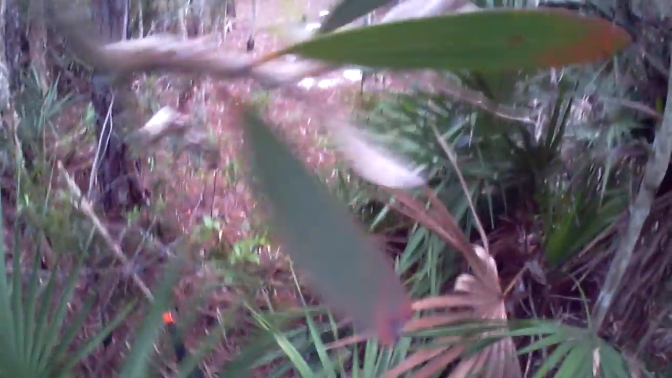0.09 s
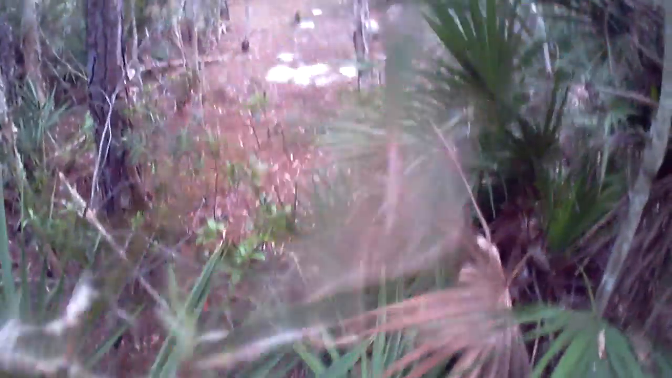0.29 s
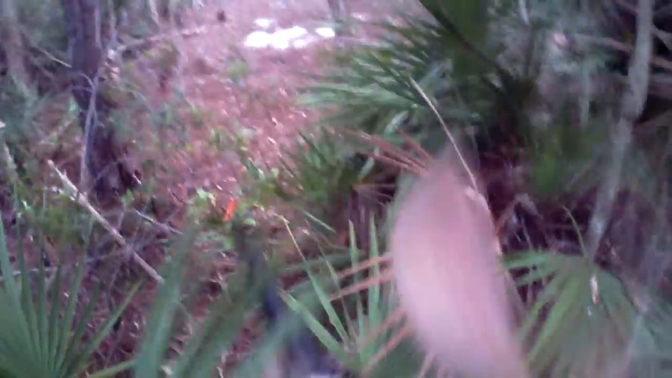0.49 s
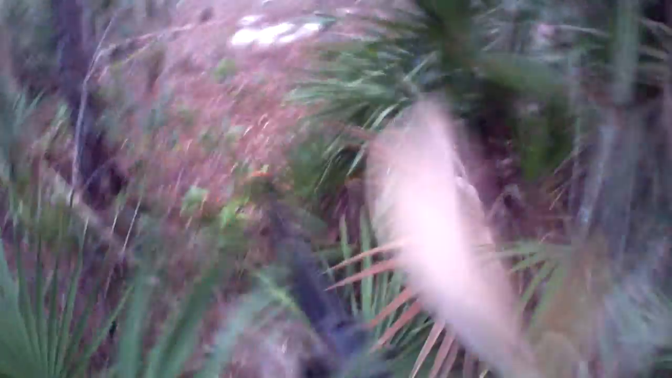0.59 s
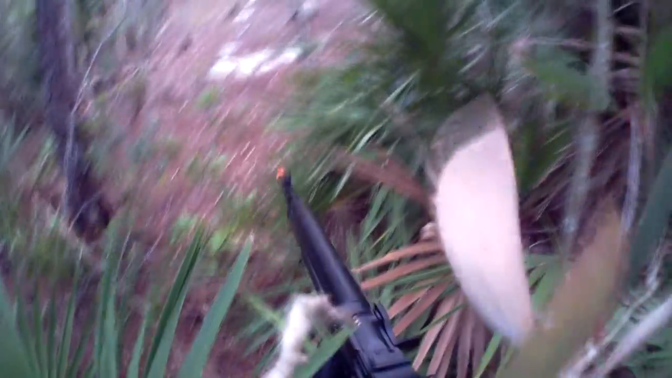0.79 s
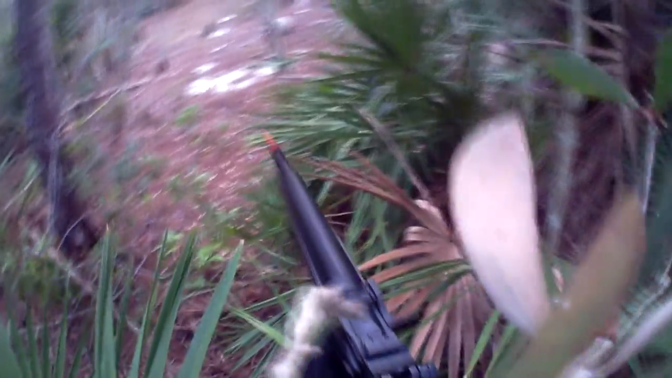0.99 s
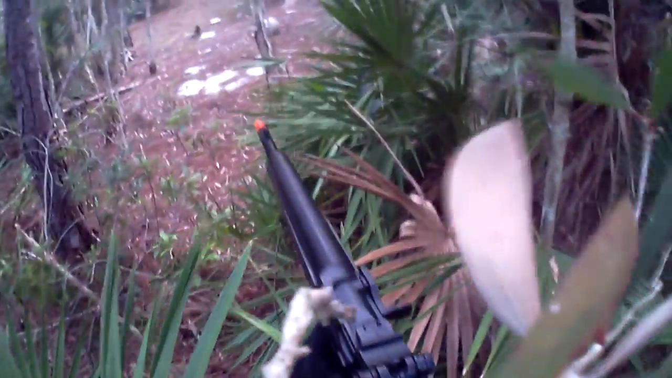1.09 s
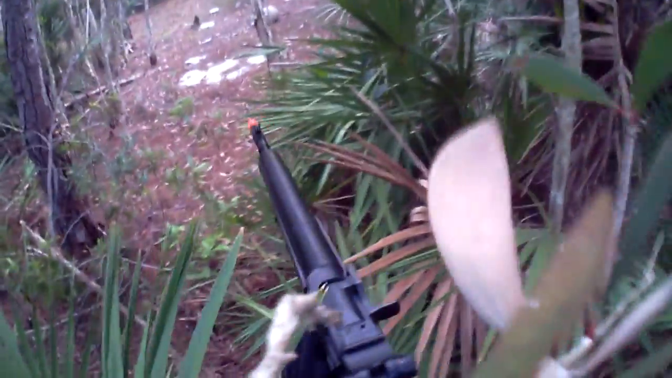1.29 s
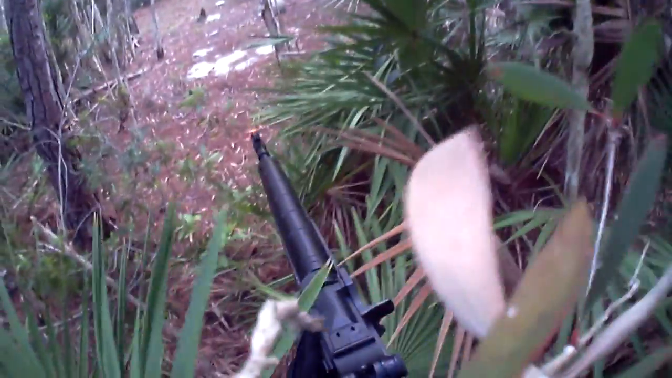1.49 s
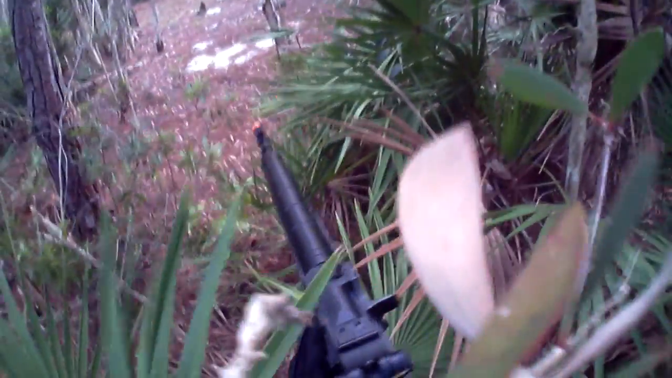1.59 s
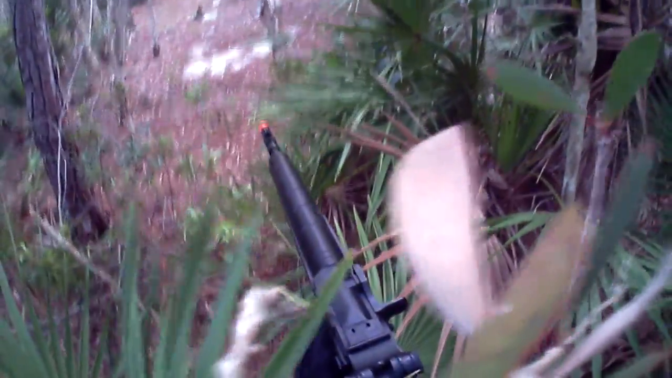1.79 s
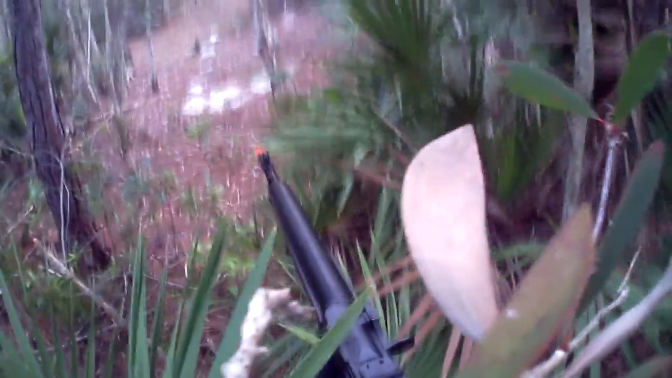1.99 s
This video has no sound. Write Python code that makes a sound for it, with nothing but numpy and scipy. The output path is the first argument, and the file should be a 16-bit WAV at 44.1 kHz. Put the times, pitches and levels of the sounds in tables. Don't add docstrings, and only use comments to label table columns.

```python
import sys
import numpy as np
from scipy import signal
from scipy.fft import rfft, irfft
from scipy.io import wavfile
from scipy.ndimage import uniform_filter1d, map_coordinates

SR = 44100
rng = np.random.default_rng(int(sys.argv[2]) if len(sys.argv) > 2 else 0)


def voltage_ratio(level):
    return 10 ** (np.asarray(level, float) / 20)


def store_wav(level_fs):
    pcm = np.round(np.clip(np.atleast_2d(level_fs), -1, 1) * 32767)
    wavfile.write(sys.argv[1], SR, pcm.T.astype(np.int16))


N = 88200

# (frequency [Hz], level [dB])
BROAD = [(180, -32), (420, 0), (1000, -4.5), (5800, -7), (11100, -6.5), (14500, -19), (16000, -80)]


def unit(x):
    return x / np.sqrt(np.mean(x ** 2) + 1e-20)


def curve(rows):
    times, db = np.transpose(rows)
    return voltage_ratio(np.interp(np.arange(N) / SR, times, db))


def wobble(rate):
    return map_coordinates(rng.standard_normal(3000), [np.arange(N) * rate / SR])


def coloured(x, points):
    f, db = np.transpose(points)
    hz = np.fft.rfftfreq(8192, 1 / SR)
    gain = voltage_ratio(np.interp(np.log(hz + 1), np.log(f + 1), db))
    cepstrum = irfft(np.log(np.maximum(gain, 1e-4)))
    cepstrum[1:4096] *= 2
    cepstrum[4097:] = 0
    pulse = irfft(np.exp(rfft(cepstrum)))
    return signal.fftconvolve(x, pulse / np.linalg.norm(pulse))[:N]


def slips(per_s, spread_db, clump_db, clump_rate):
    hit = rng.random(N) < per_s / SR
    size = rng.standard_normal(N) * voltage_ratio(spread_db * rng.standard_normal(N))
    return unit(hit * size * voltage_ratio(clump_db * wobble(clump_rate)))


def strokes(rows):
    t = np.arange(N) / SR
    total = np.zeros(N)
    for start, rise, hold, fall, db in rows:
        corners = np.cumsum([start, rise, hold, fall])
        total += voltage_ratio(db) * np.interp(t, corners, [0, 1, 1, 0]) ** 2
    return total


def ring(x, hz, width_hz):
    t = np.arange(SR // 80) / SR
    pulse = t ** 3 * np.exp(-2 * np.pi * width_hz * t) * np.sin(2 * np.pi * hz * t)
    return signal.fftconvolve(x, pulse / np.linalg.norm(pulse))[:N]


def leaf_edges(x, rate, swing_db):
    # (frequency [Hz], width [Hz], level [dB])
    resonances = [(4080, 510, -20), (7703, 950, -8.5), (8900, 1220, -3.5), (10514, 1740, -6.5),
                  (12870, 2700, -8)]
    return sum(voltage_ratio(db) * ring(x * voltage_ratio(swing_db * wobble(rate)), hz, width)
               for hz, width, db in resonances)


def patchy(x, depth_db):
    spectrum = signal.stft(x, nperseg=256)[2]
    field = rng.standard_normal(spectrum.shape)
    field = uniform_filter1d(uniform_filter1d(field, size=6, axis=0), size=4, axis=1)
    return signal.istft(spectrum * voltage_ratio(depth_db * unit(field) - 1), nperseg=256)[1][:N]


def scrapes():
    # (start [s], length [s], bright level [dB], broad rustle over it [dB])
    drags = [(0.017, 0.02, -36.5, -22), (0.072, 0.028, -37.5, -10), (0.095, 0.016, -34, -1.5),
             (0.133, 0.055, -46, -26), (0.176, 0.019, -40, -20), (0.198, 0.017, -36.5, -13),
             (0.22, 0.012, -41.5, 6), (0.23, 0.016, -20, -14.5), (0.248, 0.016, -20, -19.5),
             (0.272, 0.055, -29, -18), (0.327, 0.0082, -19.5, -12.5), (0.343, 0.014, -16.5, -15.5),
             (0.368, 0.0056, -39.5, 10), (0.379, 0.014, -25, -4), (0.389, 0.023, -23, -19),
             (0.408, 0.017, -11, -16), (0.426, 0.022, -16.5, -12), (0.444, 0.013, -16.5, -15.5),
             (0.454, 0.012, -37, -2.5), (0.473, 0.016, -30, -5), (0.501, 0.014, -26, -14.5),
             (0.607, 0.01, -49, -15.5), (0.751, 0.054, -49, 2.5), (0.782, 0.015, -41, -9.5),
             (0.633, 0.016, -46.5, -8), (0.655, 0.02, -45, -11), (1.718, 0.01, -53.5, -7.5),
             (1.515, 0.055, -62, 6), (0.8, 0.079, -45.5, 0.5), (0.871, 0.085, -57, 6),
             (0.986, 0.09, -62, 12), (1.715, 0.078, -56.5, 0.5), (1.784, 0.12, -50.5, 3),
             (1.867, 0.025, -46.5, 0), (1.88, 0.081, -60, 5.5)]
    bright = strokes([(s, 0.099 * d, 0.77 * d, 0.307 * d, db) for s, d, db, _ in drags])
    broad_gain_db = 1
    broad = strokes([(s, 0.17 * d, 0.46 * d, 0.96 * d, db + over + broad_gain_db)
                     for s, d, db, over in drags])
    bright_slips = bright * slips(per_s=14000, spread_db=3, clump_db=2.5, clump_rate=400)
    broad_slips = broad * slips(per_s=14000, spread_db=3, clump_db=1.57, clump_rate=120)
    rustle = patchy(coloured(broad_slips, BROAD), depth_db=2.5)
    return leaf_edges(bright_slips, rate=180, swing_db=3.5) + rustle


def snaps():
    # (start [s], peak level [dB], broad crack over it [dB], length [s])
    near = [(.1022, -18.5, -14, 0.0019), (0.193, -11, -18, 0.0018), (0.2734, 1, -19.5, 0.0027),
            (0.3095, 4.5, -22.5, 0.0019), (0.3568, -9, -2.5, 0.00087), (0.368, -25, -5, 0.00068),
            (0.376, -20.5, -13.5, 0.0011), (0.4045, -10, -7.5, 0.0014), (.432, -4.5, -22, 0.0017),
            (0.4499, -1.5, -24, 0.0058), (.479, -5.5, -14.5, 0.00064), (0.5005, -10, -27, .0015),
            (0.539, -31, -30, 0.004), (0.614, -27, -17, 0.0068), (0.6488, -17, -15, 0.0011)]
    # (start [s], peak level [dB], length [s])
    far = [(0.676, -38, 0.002), (0.781, -26, 0.001), (0.817, -34, 0.004), (0.8252, -22.5, 0.0032),
           (1.013, -32, 0.01), (1.318, -47, 0.00092), (1.335, -42, 0.0021), (1.347, -45, .002),
           (1.509, -48, 0.0019), (1.5168, -32, 0.003), (1.5195, -20.5, 0.002), (1.545, -44, 0.0018),
           (1.5375, -18.5, 0.0045), (1.5525, -28, 0.0061), (1.559, -36, 0.0011), (1.566, -40, 0.0033),
           (1.591, -43, 0.0069), (1.6744, -20.5, 0.0013), (1.875, -32, .003)]
    # (frequency [Hz], level [dB])
    thin = [(600, -38), (1300, 0), (3000, -6), (4300, -3), (11000, -1), (14500, -15), (16000, -80)]
    far_crack_db = -28
    rows = list(near) + [(s, db, far_crack_db, d) for s, db, d in far]
    rise_s, snap_db, burst_db, crack_db = 0.00028, -7.5, -3, 6
    bright = strokes([(s, rise_s, 0.62 * d, 0.0028, db + snap_db + burst_db) for s, db, _, d in rows])
    cracks = [(s, rise_s, 0.5 * d, 0.002, db + snap_db + over + crack_db) for s, db, over, d in rows]
    bursts = bright * slips(per_s=30000, spread_db=1.2, clump_db=2.4, clump_rate=1200)
    hiss = rng.standard_normal(N)
    near_cracks = coloured(strokes(cracks[:len(near)]) * hiss, BROAD)
    far_cracks = coloured(strokes(cracks[len(near):]) * hiss, thin)
    return leaf_edges(bursts, rate=250, swing_db=2) + near_cracks + far_cracks


def rings():
    # (start [s], frequency [Hz], peak level [dB])
    tones = [(.2735, 2070, -18), (0.2732, 3850, -10), (0.273, 5410, -13), (0.435, 4100, -18.5),
             (0.448, 4100, -14), (0.478, 2197, -22.5), (.479, 5330, -12.5), (0.65, 2160, -30.5),
             (.649, 5100, -26), (0.648, 3780, -29.5), (0.768, 4050, -25.5), (.769, 2070, -33.5),
             (0.824, 1830, -36), (.825, 4400, -30), (1.316, 4100, -50), (1.361, 4000, -46.5),
             (0.3096, 4220, -14), (1.538, 1520, -46), (1.538, 2900, -45), (1.5192, 4420, -44),
             (0.6585, 2110, -42), (1.6745, 4250, -40), (0.251, 2700, -24), (1.334, 4000, -52),
             (1.88, 5900, -24)]
    out, t = np.zeros(N + SR), np.arange(SR // 20) / SR
    cycles, rise_s, gain_db = 43.6, 0.0011, 5
    for s, hz, db in tones:
        drift = 0.11 * np.cumsum(rng.standard_normal(len(t)))
        shape = voltage_ratio(db + gain_db - 60 * t * hz / cycles) * (1 - np.exp(-t / rise_s))
        out[round(s * SR):][:len(t)] += shape * np.sin(2 * np.pi * hz * t + drift)
    return out[:N]


def ticks():
    # (time [s], peak level [dB], frequency [Hz])
    breaks = [(0.1939, -10.5, 9840), (0.249, -13, 8350), (0.251, -14, 9300), (0.2536, -9.5, 7550),
              (0.258, -7, 8340), (0.2608, -9, 8200), (0.266, -11, 11100), (0.2736, 1, 7500),
              (0.2754, -5, 8400), (0.2952, -19, 8600), (0.3101, -1.5, 7400), (0.318, -16, 8100),
              (0.3216, -16, 8900), (0.3324, -12, 7300), (0.3463, -17, 11300), (0.349, -10, 9000),
              (0.3552, -10, 8300), (0.3571, -11, 7140), (0.3592, -14, 6700), (0.369, -18.5, 6500),
              (0.3784, -11, 7400), (0.405, -6.5, 9300), (0.41, -0.5, 10100), (0.419, -2, 8500),
              (0.4324, -7, 7800), (0.446, -6, 9900), (0.4509, -2, 8600), (0.4533, -4, 8420),
              (0.4797, -9, 9300), (0.4813, -19, 8100), (0.4862, -20, 8100), (0.5009, -11.5, 8600),
              (0.5115, -14, 9000), (0.5409, -31, 8700), (0.543, -30, 8700), (0.5522, -28.5, 8700),
              (0.5546, -34, 8700), (0.5646, -36, 8900), (0.6082, -21.5, 8760), (0.6149, -29, 8700),
              (0.617, -29, 8900), (0.6499, -22.5, 10300), (0.77, -32, 9100), (0.7734, -30, 9100),
              (0.7817, -24.5, 8550), (0.8261, -22, 8600), (1.3145, -41.5, 8600), (1.3617, -35.5, 8100),
              (1.3923, -36.5, 9000), (1.411, -36, 8670), (1.5202, -23, 9200), (1.5267, -37, 8100),
              (1.54, -20.5, 8900), (1.5533, -36, 8900), (1.5553, -25.5, 8700), (1.6755, -23, 9400)]
    # (frequency [Hz], level [dB])
    port = [(4500, -45), (6600, -2), (10000, 0), (14000, 5), (16500, -40)]
    out, t = np.zeros(N + SR), np.arange(SR // 100) / SR
    t60_s, rise_s, lead_s = 0.005, 0.0002, 0.0005
    gain_db, grit_db = 1, 1
    for s, db, hz in breaks:
        grit = uniform_filter1d(rng.standard_normal(len(t)), size=3)
        shape = voltage_ratio(db + gain_db - 60 * t / t60_s) * (1 - np.exp(-t / rise_s))
        rough = 1 + voltage_ratio(grit_db) * grit
        out[round((s - lead_s) * SR):][:len(t)] += shape * np.sin(2 * np.pi * hz * t) * rough
    return coloured(out[:N], port)


def knocks():
    # (time [s], peak level [dB], frequency [Hz])
    bumps = [(.027, -35, 820), (.193, -34, 478), (0.354, -30.5, 453), (.403, -29, 640), (.449, -22, 410),
             (0.531, -34.5, 440), (0.684, -34, 446), (0.754, -37, 377), (.827, -35.5, 441),
             (1.008, -39.5, 446), (1.011, -43.5, 1305)]
    # (time [s], peak level [dB], frequency [Hz])
    thumps = [
        (0.166, -37, 123),
        (0.201, -21, 134.4),
        (0.336, -18.5, 81.7),
        (0.401, -18.5, 55),
        (0.446, -19, 129.8),
        (0.679, -31.5, 126),
        (.76, -34, 134),
        (0.908, -42, 137.6),
    ]
    out, t = np.zeros(N + SR), np.arange(SR // 5) / SR

    def tone(hz, t60_s, rise_s):
        return voltage_ratio(-60 * t / t60_s) * np.sin(2 * np.pi * hz * t) * (1 - np.exp(-t / rise_s))

    u = t * 1211
    push = voltage_ratio(7.5) * u * (2 - u) * np.exp(-u)
    for s, db, hz in bumps:
        dull_ring = 1.67 * tone(hz, t60_s=0.044, rise_s=0.0023)
        out[round(s * SR):][:len(t)] += voltage_ratio(db) * (dull_ring + push)
    for s, db, hz in thumps:
        out[round(s * SR):][:len(t)] += voltage_ratio(db + 6) * tone(hz, t60_s=0.073, rise_s=0.011)
    return out[:N]


def rumble():
    # (time [s], level [dB])
    handling = [
        (0, -46),
        (.1, -42),
        (.22, -38),
        (.3, -38.5),
        (.47, -33.5),
        (.55, -50),
        (1.03, -52),
        (1.1, -65.5),
        (2, -56.5),
    ]
    # (frequency [Hz], level [dB])
    handling_tone = [(12, -33), (25, 2.5), (133, 1), (218, -8), (900, -22.5), (1500, -52)]
    # (frequency [Hz], level [dB])
    wind_tone = [(12, -38.5), (22, 6), (44, -1), (100, -18.5), (400, -40)]
    lumpy = curve(handling) * voltage_ratio(5.37 * wobble(29.77))
    lumps = lumpy * coloured(rng.standard_normal(N), handling_tone)
    wind = voltage_ratio(-50 + 1.1 * wobble(24)) * coloured(rng.standard_normal(N), wind_tone)
    return lumps + wind


def leaves():
    # (time [s], level [dB])
    wash_level = [(0, -46), (.1, -51), (.3, -45.5), (.53, -47.5), (.6, -59), (.64, -48), (.7, -52.5),
                  (.75, -52), (.95, -60.5), (1.7, -82), (1.9, -49.5), (2, -61.5)]
    # (frequency [Hz], level [dB])
    wash_tone = [(180, -32.5), (420, -4), (1000, -4.5), (5800, -7), (11100, -5.5), (14500, -18),
                 (16000, -80)]
    # (frequency [Hz], level [dB])
    air_tone = [(120, -27.5), (250, 0), (1000, -5), (2050, -17), (9000, -18.5), (13500, -23.5),
                (16000, -21)]
    rubbing = slips(per_s=19000, spread_db=0.79, clump_db=2.3, clump_rate=200)
    wash = curve(wash_level) * voltage_ratio(1.8 * wobble(40)) * coloured(rubbing, wash_tone)
    air = voltage_ratio(-60.5 + 1.1 * wobble(33)) * coloured(rng.standard_normal(N), air_tone)
    return wash + air


def scene():
    fronds = scrapes() + snaps() + rings() + ticks()
    return (fronds + knocks() + rumble() + leaves())[None]


def top_cut(x):
    return signal.sosfilt(signal.butter(12, 16480, fs=SR, output="sos"), x)


def record(dry):
    # (treble level [dB], highest frequency [Hz])
    kept_treble = [(-70, 13300), (-50, 14700), (-22, 16200)]
    clipped = dry / (1 + np.abs(dry) ** 6) ** (1 / 6)
    hz, _, spectrum = signal.stft(clipped, SR, nperseg=1024)
    treble_power = 2 * np.sum(np.abs(spectrum[0, hz > 9000]) ** 2, axis=0)
    treble_db = 10 * np.log10(treble_power + 1e-12)
    top_hz = np.interp(treble_db, *np.transpose(kept_treble))
    mix = signal.istft(spectrum * (hz[:, None] < top_hz), SR, nperseg=1024)[1][:, :N]
    return top_cut(mix)


dry = scene()
out = record(dry)
store_wav(out)
```